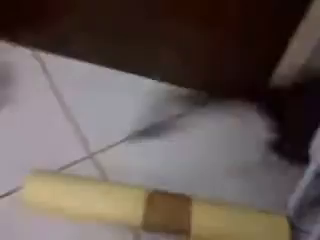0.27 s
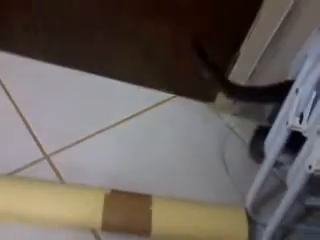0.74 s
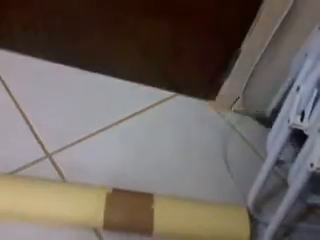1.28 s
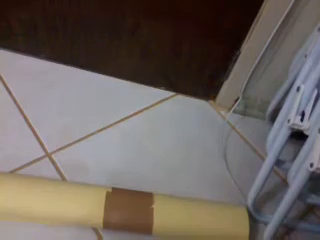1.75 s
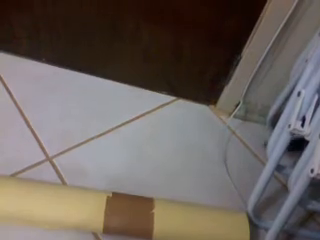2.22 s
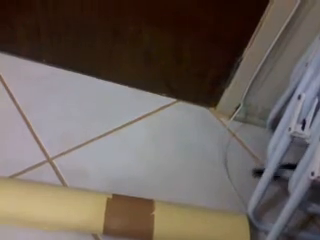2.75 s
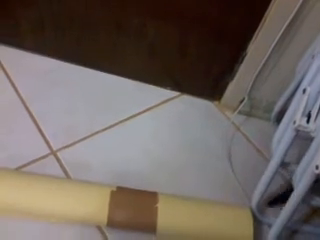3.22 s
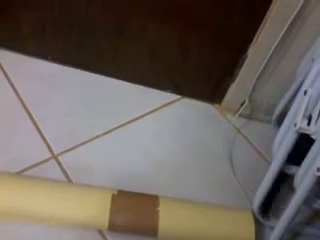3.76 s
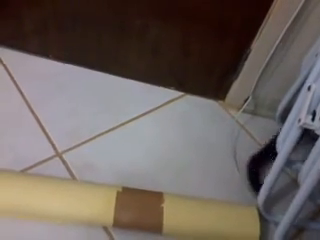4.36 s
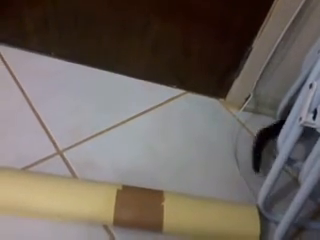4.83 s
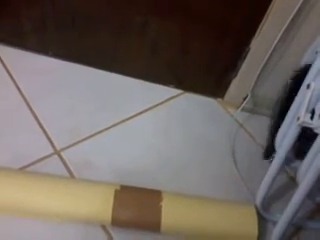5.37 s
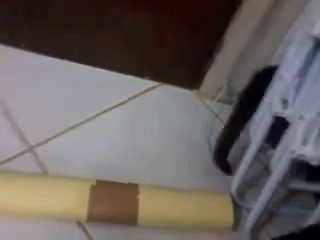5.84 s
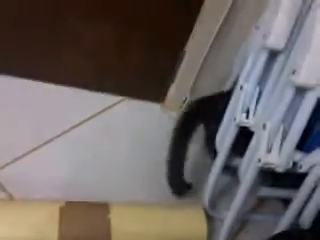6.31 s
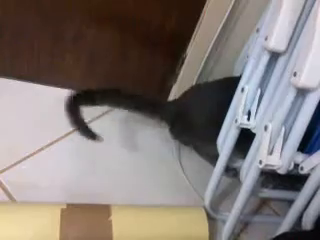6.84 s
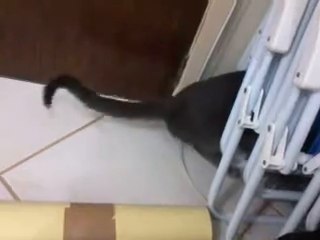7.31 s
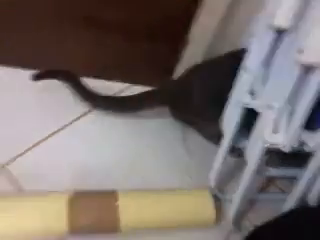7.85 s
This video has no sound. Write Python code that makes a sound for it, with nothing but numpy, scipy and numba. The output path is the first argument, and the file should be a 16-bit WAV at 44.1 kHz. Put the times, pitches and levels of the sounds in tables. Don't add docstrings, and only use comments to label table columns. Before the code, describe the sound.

A phone held close in a small tiled room picks up low rumble and narrow hiss. Light folded metal frames scrape and rattle, then clack hard as a cat pushes behind them. After a lull come more clatters, then faint scrapes, ringing rods and a tiny hinge squeak. The densest, brightest banging arrives near the end, with claw taps and a frame sliding on tile.

```python
import sys
import numpy as np
from scipy import signal
from scipy.fft import rfft, irfft
from scipy.io import wavfile
from scipy.ndimage import uniform_filter1d, map_coordinates
from numba import njit

SR = 44100
rng = np.random.default_rng(int(sys.argv[2]) if len(sys.argv) > 2 else 0)


def undo_db(level):
    steps = np.asarray(level, float) / 20
    return 10 ** steps


def store_pcm(level_fs):
    pcm = np.round(np.clip(level_fs, -1, 1) * 32767).astype(np.int16)
    wavfile.write(sys.argv[1], SR, np.atleast_2d(pcm).T)


N = 356328

# (frequency [Hz], level [dB per Hz])
AIR_COLOUR = [(32, -38), (55, 1), (118, -24.5), (273, -1), (428, -4), (505, 0), (633, 0), (809, 0.5),
              (1690, -8.5), (3770, -30), (6710, -4.5), (7430, 2.5), (9660, -36), (16300, -120)]
# (time [s], level [dB])
RUMBLE_SWELL = [(0.0, -54), (0.47, -51.5), (0.81, -63), (1.44, -48), (2.59, -60.5), (4.0, -53), (4.23, -64),
                (4.34, -48), (4.66, -49), (4.73, -56.5), (5.06, -48), (5.2, -65), (5.4, -46), (5.47, -57.5),
                (7.38, -46), (7.47, -56), (7.88, -49), (8.08, -60)]

# (time [s], effort [dB], edge over flat [dB])
PUSHING = [(0.0, -43.5, -3.5), (0.67, -54, -15), (0.85, -31.5, 4), (1.12, -51, -1), (1.94, -45.5, 1.5),
           (2.11, -43.5, 11), (2.77, -36.5, 1.5), (2.95, -44.5, -1), (3.44, -48.5, 7), (4.41, -40.5, -1.5),
           (4.97, -47.5, 0), (5.47, -48, 3), (5.56, -35, -1.5), (6.57, -48, -1.5), (6.75, -41.5, -1.5),
           (7.3, -40, 0.5), (7.6, -43, -4), (8.08, -68, 15)]
# (time [s], force [dB], edge over flat [dB], hollow foot [dB])
SCRAPING = [(0.076, -25, 1.5, -24), (0.18, -26, 5, -25), (0.325, -12, 7, -10.5), (0.5192, -31.5, 1, -14),
            (0.6281, -15, -7, -21.0), (0.665, -15, 13, -33.5), (0.6794, -8.5, 43, -27),
            (0.7154, -10.5, 33, -39), (0.741, -26, 1, -28), (1.4614, -36, 4, -25), (1.6084, -29.5, 24, -8),
            (2.03, -21.5, -1, -3), (2.074, -18.5, 1, -8.5), (2.1694, -22, 2, -21),
            (2.1984, -16.5, 17, -8.5), (2.7734, -13.5, 7, -18), (2.7917, -16, -0.5, -10),
            (3.1193, -32.5, 2, -5), (3.667, -37, 20, -25), (3.7645, -29.5, 14, -17.5),
            (3.918, -28, -3, -2.5), (4.78, -40, 15, -20), (4.3645, -30, 15, 0.5), (4.7287, -31, 12, -6),
            (5.5994, -15, -4, -9), (6.2336, -25.5, 3, -17), (6.53, -34, 11, -15), (6.769, -9.5, 4, -10.5),
            (6.782, -33, 27, -25), (6.9856, -34, 14, -11)]
# (time [s], force [dB], edge over flat [dB], hollow foot [dB])
LONG_RATTLES = [(0.277, -16, -2, -40), (0.645, -20, -8, -51), (0.9587, -24.5, 6, 0), (2.2213, -23, -27, -6),
                (2.293, -24, 1, -35), (2.39, -22, -13, -10.5), (2.4343, -23.5, -2, -12),
                (2.4765, -17.5, -7, -10.5), (2.867, -21.5, 1, -23), (3.1392, -22.5, -1.5, -3.5),
                (3.6865, -35.5, -16, -7), (3.721, -32.5, -5.5, -10), (4.022, -32.5, -2, -6),
                (4.131, -16.5, -7, -7.5), (5.089, -37, 2, -22), (5.1636, -27, 2.5, -8.5),
                (5.41, -19.5, -8.5, -7.5), (5.472, -29, 3, -23), (6.178, -36.5, -1, -15),
                (6.219, -21, -5, -5), (6.623, -11, 18, -18.5), (6.717, -29, -2.5, -4),
                (7.011, -27.5, 0, -26), (7.412, -27.5, 10, -12), (7.909, -29, 7, -11)]
# (time [s], force [dB], edge over flat [dB], hollow foot [dB])
PLAIN_KNOCKS = [(0.353, -18.5, 14, -13), (0.642, -16.5, 16, -29), (0.9207, -22, 16, -9),
                (1.042, -21.5, -22, -9), (1.714, -37, -7, -4), (1.926, -23.5, -1.5, 2),
                (2.746, -13, -8, -6.5), (4.142, -24.5, 8, 5), (4.5337, -29.5, -6, -9),
                (4.5431, -20, 44, -13), (5.5237, -30, -15, 0), (5.5673, -35, 8, -18),
                (5.611, -15, -1.5, -20), (6.079, -39, 18, 4), (6.291, -32.5, 4, -7),
                (6.544, -29.5, -10, -5), (6.5835, -8, -3, -10), (6.648, -19, 3, -35),
                (6.7564, -16.5, -10, -12), (7.0371, -28.5, -5, 7.5), (7.2905, -12.5, -3, 1),
                (7.4015, -16, -11.5, -4.5), (8.0021, -19.5, -16, 3.5)]
# (time [s], force [dB], edge over flat [dB], hollow foot [dB])
FURTHER_KNOCKS = [(0.8729, -1.5, -8.5, -34), (0.8852, -7.5, -5.5, -8.5), (2.0603, -14.5, -5, -7.5),
                  (2.2865, -21.5, 1.5, 2.5), (2.4173, -14, -38, -8), (2.5785, -6, 13, -30),
                  (2.5976, -15.5, 10, -35), (2.7066, -21, -14.5, -24), (3.7974, -39, 12, -28),
                  (5.5546, -27, -4, -13), (5.934, -21.5, 3, -6), (6.5973, -20, 1, 1), (6.6359, -6.5, 6, -39),
                  (7.1745, -5, 20, -31), (7.238, -14.5, -3, -6), (7.3306, -28, -5, -3),
                  (7.4682, -29.5, 21, -41), (7.496, -24, 9, -32), (7.6238, -9.5, 13, -14.5),
                  (7.865, -24.5, -1, 7), (7.9892, -16, 3, -20)]
# (time [s], force [dB], edge over flat [dB], hollow foot [dB])
REBOUNDS = [(0.2894, -19, 4, -10), (0.3363, -24, 7, 2), (0.346, -13.5, 15, -3), (0.6456, -25, -5, 0),
            (0.6699, -14, -2, -21), (0.6813, -28, 2, -17.5), (0.689, -25, 6, -19), (0.696, -12, -5, -22),
            (0.7148, -5, -9, -24), (0.722, -16, 6, -13), (0.7414, -22, 1, -17), (0.894, -17, 14, -3),
            (0.9015, -18, 9, -11), (0.906, -5, -10, -20), (0.9717, -13, 4, -22), (2.079, -17, -14, -14),
            (2.2955, -7.5, -7, -15), (2.401, -17, 10, -15), (2.4226, -18, 4, -22), (2.4626, -15, -2, -13),
            (2.591, -3.5, 7, -10), (2.599, -12, 9, -15), (2.6229, -11, -8, -12), (2.795, -17, -8, 0),
            (3.0683, -35, 1, -15), (4.1515, -27, -12, -8), (4.1624, -33, 5, -15), (4.329, -37, 0, -13),
            (4.553, -35, -6, -11), (5.459, -30, 11, -19), (5.6216, -23, 7, -11), (6.628, -5, -4, -19),
            (6.668, -19, 3, -10), (6.7077, -11, -12, -5), (6.72, -17, -8, -15), (6.7926, -16, 5, -17),
            (7.1781, -1.5, 1, -9.5), (7.2494, -25, -1, -22), (7.3, -9, -7, -19), (7.416, -28, -10, -21),
            (7.5875, -15.5, 4, -13), (7.6288, -3.5, 19, -25), (7.7244, -11, -18, -21), (7.955, -22, 1, -25)]

# (frequency [Hz], level [dB], T60 [s])
WALL_MODES = [(4710, -17, 0.026), (5390, -15.5, 0.01), (5460, -13.5, 0.01), (5840, -15, 0.015),
              (6240, -10, 0.037), (6000, -19.5, 0.016), (6660, 6, 0.025), (6967, 15, 0.025),
              (7390, 13.5, 0.019)]
# (frequency [Hz], level [dB], T60 [s])
FOOT_MODES = [(295.8, -22.5, 0.2), (335, -13.5, 0.067), (446.4, -8.5, 0.1), (510, -7, 0.022),
              (620, 1.5, 0.013), (714, -4.5, 0.023), (920, -2.5, 0.011)]
# (frequency [Hz], level [dB], T60 [s])
TUBE_MODES = [(1063, -10.5, 0.046), (1194, -18, 0.0081), (1330, -1.5, 0.016), (1510, -4, 0.02),
              (1622, -0.5, 0.018), (1747, -1.5, 0.018), (1840, -0.5, 0.018), (1878, -6.5, 0.018)]
# (frequency [Hz], level [dB], T60 [s])
JOINT_MODES = [(2325, -2.5, 0.0099), (2785, -2.5, 0.0085), (3186, 0, 0.0064), (3635, -7, 0.01),
               (4084, -3, 0.01)]
PITCH_BEND = (.012, .03, .03, .03)
# (wall [dB], foot [dB], tube [dB], joint [dB])
DRAG_SHARE = (1.5, 0, 2, 4.5)

# (time [s], frequency [Hz], level [dB], T60 [s])
ROD_RINGS = [(.095, 4570, -48, .4), (.195, 4550, -48, .3), (.17, 4110, -52, .4), (.238, 4575, -46, .3),
             (2.878, 4610, -21, .15), (2.897, 4610, -26, .12), (2.955, 4610, -45, .25),
             (3.03, 4610, -54, .4), (3.478, 4520, -45, .18), (3.51, 4515, -48, .8), (3.66, 4500, -52, .5),
             (3.74, 4550, -49, .4), (3.845, 4520, -48, .35), (3.5, 4105, -52, 1.), (3.59, 4115, -51, .8),
             (3.70, 4070, -51, .6), (4.138, 4605, -37, .36), (4.33, 4300, -48, .2), (4.36, 4520, -46, .3),
             (4.46, 4520, -55, .6), (4.33, 4085, -50, .2), (6.668, 4650, -33, .3), (6.735, 4600, -34, .2),
             (7.185, 4912, -27, .45), (7.236, 4912, -22, .3), (7.238, 4770, -29, .12),
             (7.63, 4930, -36, .5), (7.735, 4900, -37, .2), (3.89, 4500, -49, .5)]
# (time [s], frequency [Hz], level [dB], T60 [s])
CLIP_CLINKS = [(1.718, 1930, -42, .08), (2.6, 4800, -32, .25), (5.598, 1738, -28, .2),
               (6.32, 1800, -41, .3), (.277, 1560, -21, .06), (.338, 1200, -27, .15),
               (.644, 1750, -22, .08), (.668, 1660, -22, .1), (.695, 1580, -24, .1), (.716, 1620, -23, .12),
               (2.287, 1560, -25, .1), (2.746, 1850, -19, .05), (3.14, 1800, -27, .05),
               (4.537, 1308, -39, .26), (4.537, 441, -38, .2), (5.937, 1800, -34, .12),
               (6.771, 1450, -24, .08), (2.885, 1700, -33, .2), (5.1, 1720, -35, .05),
               (5.112, 1720, -43, .3), (5.157, 1750, -33, .1), (5.172, 1810, -35, .15),
               (4.024, 1850, -34, .06), (6.6, 1533, -21, .25), (6.636, 5750, -15, .1),
               (6.636, 6850, -16, .08), (7.2, 3850, -32, .12), (2.198, 6850, -27, .12),
               (.874, 1350, -16, .1), (.885, 1650, -17, .06), (2.06, 1350, -24, .15),
               (7.177, 6320, -21, .2), (7.177, 6530, -21, .15), (7.29, 4785, -35, .25),
               (7.626, 6330, -19, .09), (7.65, 6400, -33, .2), (7.68, 4800, -31, .2),
               (7.625, 3280, -27, .1), (7.626, 1920, -25, .09), (8.0, 4800, -34, .2)]
# (time [s], peak [dB], frequency [Hz], length
DRY_TAPS = [(.354, -31, 300, 2.4), (.8755, -12, 1100, 4.), (.881, -19, 560, 3.), (1.627, -55, 130, 1.2),
            (1.9281, -12, 1300, 1.), (2.219, -27, 450, 1.6), (2.232, -29, 380, 2.),
            (2.3578, -24, 480, 1.3), (2.357, -25, 1800, 1.), (2.961, -33, 480, 1.5),
            (2.4346, -13, 3200, 2.), (2.982, -31, 2200, 1.2), (3.002, -33, 2400, 1.2),
            (3.098, -32, 1600, 1.2), (3.69, -33, 1100, 2.), (3.8, -27, 1800, 4.), (4.212, -33, 400, 1.5),
            (4.38, -33, 480, 3.), (5.166, -31, 900, 2.), (5.478, -30, 1700, 4.), (5.568, -28, 1750, 5.),
            (4.45, -55, 130, 1.2), (5.698, -17, 1600, 1.4), (6.587, -46, 130, 1.2),
            (6.5863, -3.5, 1620, 6.5), (7.014, -27, 1500, 5.), (.646, -15, 1750, 4.),
            (1.467, -38, 2000, 2.), (1.9285, -33, 300, 1.5), (2.0615, -17, 1400, 3.),
            (2.2875, -20, 1550, 4.), (2.418, -14, 1300, 4.), (2.5805, -14, 1900, 5.),
            (4.132, -21, 1600, 5.), (4.1435, -15, 1400, 3.5), (4.21, -27, 6300, 12.),
            (4.3, -36, 6600, 15.), (6.597, -11, 1650, 6.), (6.6252, -11, 1750, 3.),
            (6.6295, -12, 1750, 4.), (7.238, -17, 1900, 3.), (6.651, -10, 5900, 12.),
            (7.496, -27, 4100, 8.), (7.627, -12, 3200, 5.), (7.243, -24, 520, 3.5), (7.405, -25, 600, 5.),
            (7.497, -26, 1800, 5.), (7.5897, -28, 900, 3.), (7.7742, -20, 1500, 1.5),
            (2.2, -24, 6700, 14.), (2.209, -21, 6900, 16.), (2.2175, -20, 6900, 14.),
              (2.229, -27, 2300, 1.5), (2.297, -16, 6500, 8.), (2.593, -14, 3000, 5.),
              (2.697, -31, 620, 4.), (2.697, -32, 1950, 6.), (2.778, -21, 1850, 5.), (2.797, -17, 1750, 5.),
              (3.69, -33, 1550, 5.), (3.767, -28, 6100, 18.), (3.8075, -22, 6500, 12.),
              (.278, -17, 1500, 4.), (7.332, -23, 1600, 6.), (1.928, -20, 2700, 1.5), (3.87, -39, 1900, 9.),
              (5.071, -41, 1600, 7.), (5.165, -24, 1700, 6.), (5.6115, -18, 1700, 5.),
              (6.644, -14, 1700, 6.), (7.1755, -9, 3600, 6.), (7.239, -16, 5600, 16.),
              (7.416, -26, 4650, 16.), (7.6262, -7, 6300, 14.), (7.869, -22, 2100, 5.),
              (7.911, -27, 1800, 4.), (7.958, -26, 2200, 5.), (7.991, -16, 6150, 20.),
              (7.992, -22, 2700, 3.), (8.005, -22, 620, 4.)]
# (start [s], stop [s], start pitch [Hz], stop pitch [Hz], level [dB])
HINGE_SLIP = (3.752, 3.812, 6030, 6200, -35)
# (start [s], stop [s], start pitch [Hz], stop pitch [Hz], level [dB])
TUBE_SLIDE = (7.72, 7.93, 3000, 3850, -39.5)


def level(x, db):
    return x * undo_db(db) / np.sqrt(np.mean(x ** 2))


def band(x, hz, width_hz):
    return signal.lfilter(*signal.iirpeak(hz, hz / width_hz, fs=SR), x)


@njit
def mode(x, hz, t60):
    y = np.empty(len(x))
    z = 0j
    decay = np.exp(-np.log(1000) / (t60 * SR))
    for i in range(len(x)):
        if i % 64 == 0:
            turn = decay * np.exp(2j * np.pi * hz[i] / SR)
        z = z * turn + x[i]
        y[i] = z.imag
    return y


def walk(rate):
    hold = int(SR / rate)
    steps = np.repeat(rng.standard_normal(N // hold + 1), hold)
    return 1.064 * uniform_filter1d(steps, hold)[:N]


def air():
    hz, db = np.transpose(AIR_COLOUR)
    f = np.arange(N // 2 + 1) * SR / N + 1
    hiss = 0
    for centre_hz in 60 * 2. ** np.arange(8):
        share = np.cos(np.pi / 2 * np.clip(np.log2(f / centre_hz), -1, 1))
        colour = undo_db(np.interp(np.log(f), np.log(hz), db)) * share
        hiss = hiss + undo_db(2.2 * walk(7.0)) * irfft(rfft(rng.standard_normal(N)) * colour, N)
    drone = band(rng.standard_normal(N), hz=437.8, width_hz=5.8)
    rumble_hz = 32.5 * (1 + .04 * walk(6.1))
    rumble = np.sqrt(2) * np.sin(2 * np.pi * np.cumsum(rumble_hz) / SR)
    rumble_db = np.interp(np.arange(N) / SR, *np.transpose(RUMBLE_SWELL))
    rumble_db = rumble_db + 2.5 * uniform_filter1d(walk(13), size=1500)
    return level(hiss, -49) + level(drone, -62) + rumble * undo_db(rumble_db)


def contacts(per_s, last_s, rest):
    when, size = rng.random((2, N))
    hits = (when < per_s / SR) * size
    touch = signal.lfilter([1], [1, -np.exp(-1 / (last_s * SR))], hits)
    return level(rest + level(touch, 0), 0)


def shares(force_db, edge_db, hollow_db):
    wall_db = np.minimum(edge_db, 0)
    tube_db = -np.maximum(edge_db, 0)
    joint_db = -7 - 0.66 * np.abs(edge_db) + 0.09 * edge_db
    return undo_db(force_db + np.array([wall_db, hollow_db, tube_db, joint_db]))


def blows(bounce, chatter, blow_s, rise_s, swell_s, scrape_db):
    t = np.arange(SR // 3) / SR
    blow = np.exp(-t / blow_s) * (1 - np.exp(-t / rise_s))
    swell = undo_db(scrape_db) * (1 - np.exp(-(t / swell_s) ** 2))
    shake = undo_db(-18.5) * np.exp(-t / 0.048)
    out = np.zeros((4, N + SR))
    kinds = ((FURTHER_KNOCKS, 0.01, True), (PLAIN_KNOCKS, 0.0092, True),
             (LONG_RATTLES, 0.034, True), (SCRAPING, 0.013, False))
    for table, fade_s, struck in kinds:
        flurry = np.exp(-t / fade_s)
        for s, *strike in table:
            i = int(s * SR)
            n = min(len(t), N - i)
            bouncing = flurry[:n] * bounce[i:i + n]
            shape = blow[:n] + bouncing if struck else swell[:n] * bouncing
            shaking = undo_db(-7.0) * shake[:n] * chatter[i:i + n]
            out[:, i:i + n] += shares(*strike)[:, None] * (shape + shaking)
    n = SR // 20
    rebound = (blow + 0.2 * np.exp(-t / 0.0043))[:n]
    for s, force_db, *strike in REBOUNDS:
        i = int(s * SR)
        out[:, i:i + n] += shares(force_db - 7.5, *strike)[:, None] * rebound
    return out[:, :N]


def part(modes, push, shift_db, bend):
    out = 0
    for hz, db, t60 in modes:
        feed = push * rng.standard_normal(N) * undo_db(shift_db * walk(20)) + 1e-18
        out = out + undo_db(db) * mode(feed, hz * (1 + bend * walk(22)), 1. * t60)
    return out


def frames():
    t = np.arange(N) / SR
    s, effort_db, edge_db = np.transpose(PUSHING)
    effort_db = np.interp(t, s, effort_db)
    edge_db = np.interp(t, s, edge_db)
    bounce = undo_db(-12) * contacts(per_s=200, last_s=.002, rest=1.3)
    chatter = contacts(per_s=160, last_s=0.0045, rest=2.03)
    knocking = blows(bounce, chatter, blow_s=0.00054, rise_s=0.0004, swell_s=0.0052, scrape_db=1.5)
    since = t - 7.63
    drag = (since > 0) * undo_db(-33 + 5.5 * since)
    families = (WALL_MODES, FOOT_MODES, TUBE_MODES, JOINT_MODES)
    blow_db = (-19.5, -20.5, -24.0, -17.5)
    rub_db = (-28.0, -32, -33.0, -30.0)
    lean = (0.67, -0.77, -0.87, -0.25)
    out = 0
    for k, modes in enumerate(families):
        rubbing = undo_db(effort_db + lean[k] * edge_db + rub_db[k]) * chatter
        dragging = undo_db(rub_db[k] + DRAG_SHARE[k]) * drag * chatter
        push = undo_db(blow_db[k]) * knocking[k] + rubbing + dragging
        ringing = part(modes, push, shift_db=1.4, bend=PITCH_BEND[k])
        highpass = signal.butter(2, 0.5 * modes[0][0], "high", fs=SR, output="sos")
        out = out + signal.sosfilt(highpass, ringing)
    return out


def rings():
    out = np.zeros((2, N))
    throb = (walk(70), walk(120))
    for k, table in enumerate((ROD_RINGS, CLIP_CLINKS)):
        for s, hz, db, t60 in table:
            i = int(s * SR)
            t = np.arange(min(int(t60 * SR), N - i)) / SR
            waver = 1 + .003 * throb[1 - k][i:i + len(t)]
            turn = 2 * np.pi * hz * np.cumsum(waver) / SR
            start = 2 * np.pi * hz * i / SR
            pair = np.sin(turn + start) + .3 * np.sin(1.006 * turn + start)
            out[k, i:i + len(t)] += undo_db(db - 60 * t / t60) * (1 - np.exp(-t / .003)) * pair
    return out[0] * undo_db(3.8 * throb[0]) + out[1] * undo_db(3.0 * throb[1])


def taps():
    out = np.zeros(N)
    t = np.arange(-SR // 20, SR // 20) / SR
    for s, db, hz, cycles in DRY_TAPS:
        i = int(s * SR) - SR // 20
        swell = np.exp(-(2 * t * hz / cycles) ** 2)
        out[i:i + len(t)] -= undo_db(db) * swell * np.sin(2 * np.pi * hz * t)
    return out


def squeak():
    start, stop, from_hz, to_hz, db = HINGE_SLIP
    t = np.arange(N) / SR
    hz = np.interp(t, [start, stop], [from_hz, to_hz]) * (1 + .035 * walk(700))
    swell = np.interp(t, [start - .015, start, stop, stop + .003], [0, .7, 1, 0])
    return undo_db(db + 5.6 * walk(150)) * swell * np.sin(2 * np.pi * np.cumsum(hz) / SR)


def slide():
    start, stop, from_hz, to_hz, db = TUBE_SLIDE
    t = np.arange(N) / SR
    swell = np.interp(t, [start - .04, start, stop - .05, stop], [0, 1, 1, 0])
    hz = np.interp(t, [start, stop], [from_hz, to_hz])
    return swell * level(mode(rng.standard_normal(N), hz, .006), db)


def room(x):
    t60_s = 0.28
    t = np.arange(SR // 2) / SR
    noise = rng.standard_normal(len(t))
    dull = uniform_filter1d(noise, size=8)
    bright = noise - dull
    tail = dull * undo_db(-60 * t / t60_s) + bright * undo_db(-60 * t / (1.19 * t60_s))
    tail = tail * (1 - np.exp(-t / 0.0065))
    wet = signal.fftconvolve(x, tail * undo_db(-5.5) / np.sqrt(np.sum(tail ** 2)))[:N]
    return map_coordinates(wet, [np.arange(N) + .00015 * SR * walk(35)], mode="mirror")


def scene():
    metal = signal.sosfilt(signal.butter(4, 240, "high", fs=SR, output="sos"), frames())
    near = rings() + taps() + squeak() + slide()
    return (metal + near + room(metal + .35 * near) + air())[None]


def band_limit(x):
    return signal.sosfilt(signal.butter(12, 9780, fs=SR, output="sos"), x)


def record(dry):
    rate_hz = 16000
    x = signal.sosfilt(signal.cheby2(8, 55, 7950, fs=SR, output="sos"), dry)
    mirror = x * np.cos(2 * np.pi * rate_hz * np.arange(N) / SR)
    image_band = signal.butter(3, [8200, 8700], "band", fs=SR, output="sos")
    x = x + undo_db(-13.0) * signal.sosfilt(image_band, mirror)
    x = np.clip(x, -.72, .72)
    return band_limit(x)


dry = scene()
out = record(dry)
store_pcm(out)
```